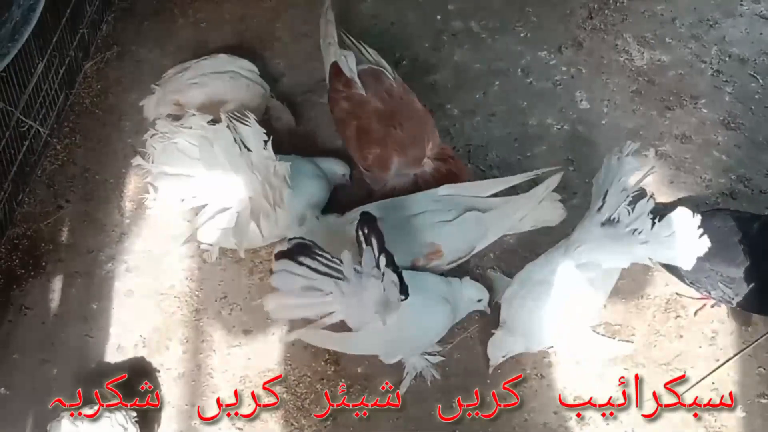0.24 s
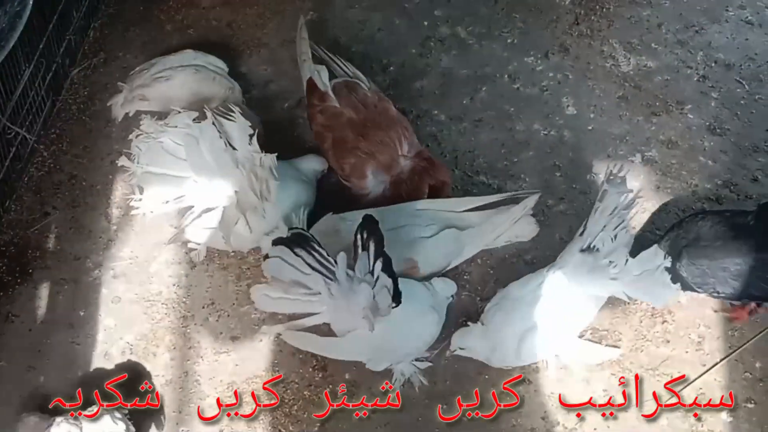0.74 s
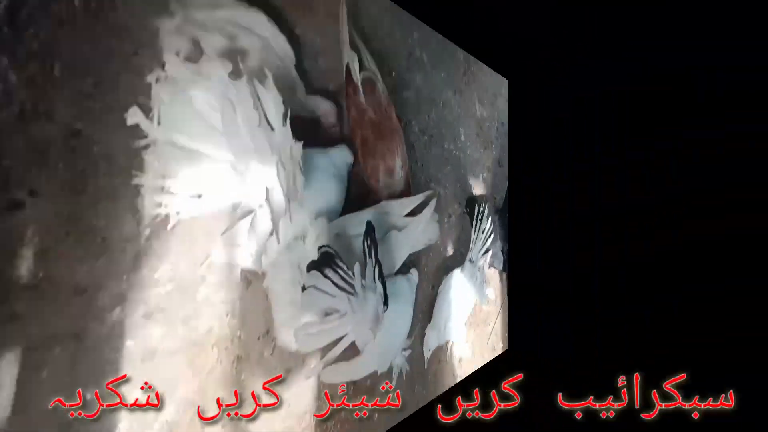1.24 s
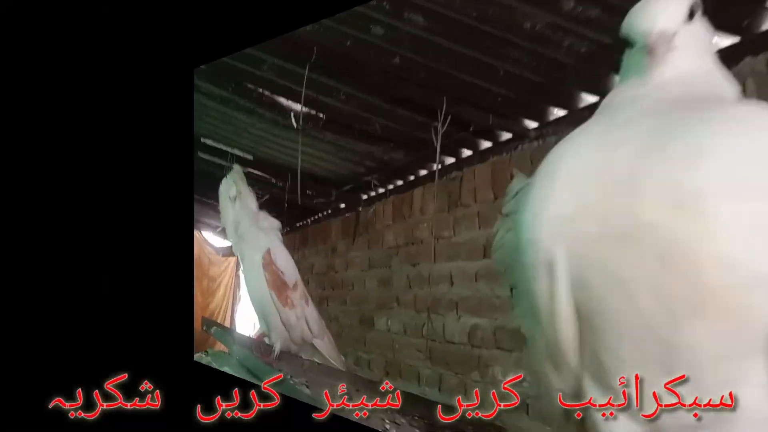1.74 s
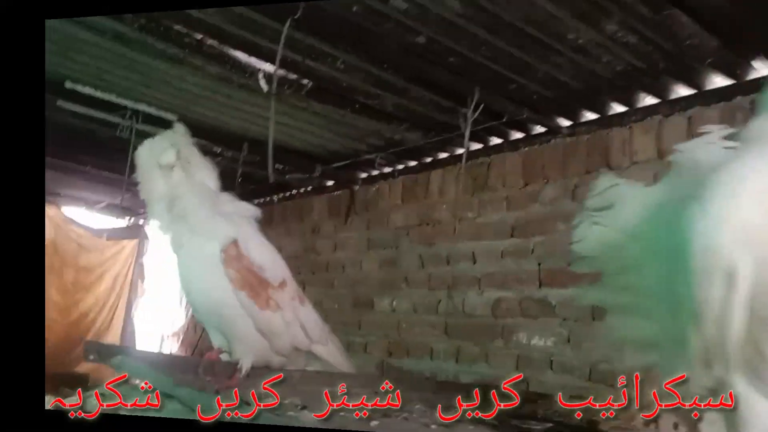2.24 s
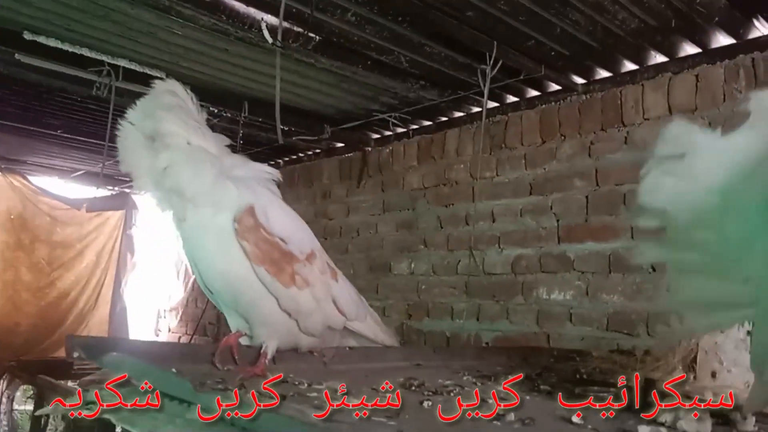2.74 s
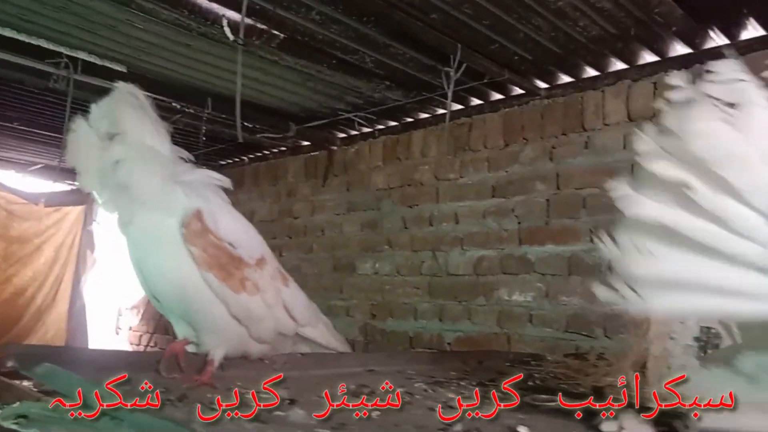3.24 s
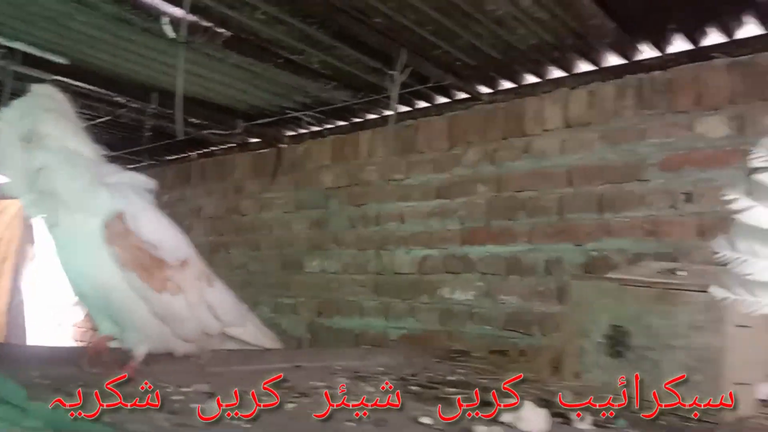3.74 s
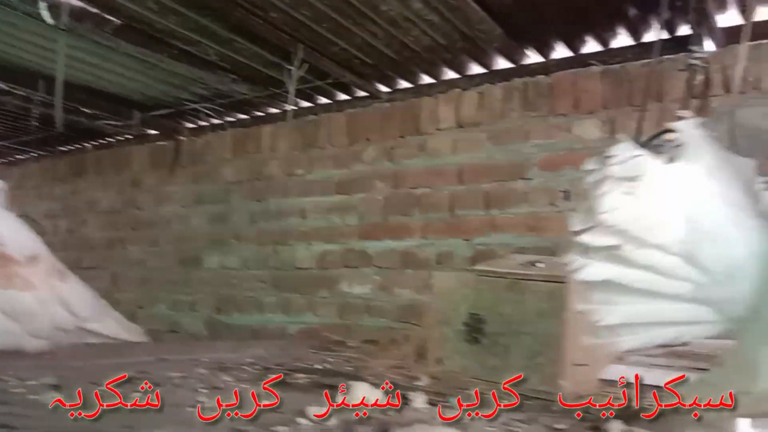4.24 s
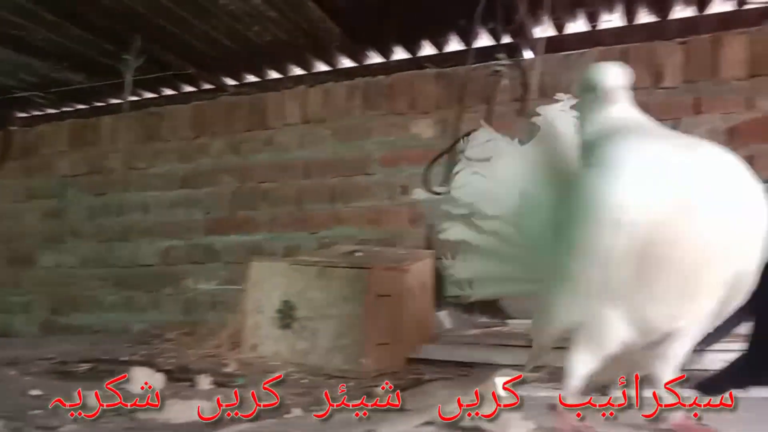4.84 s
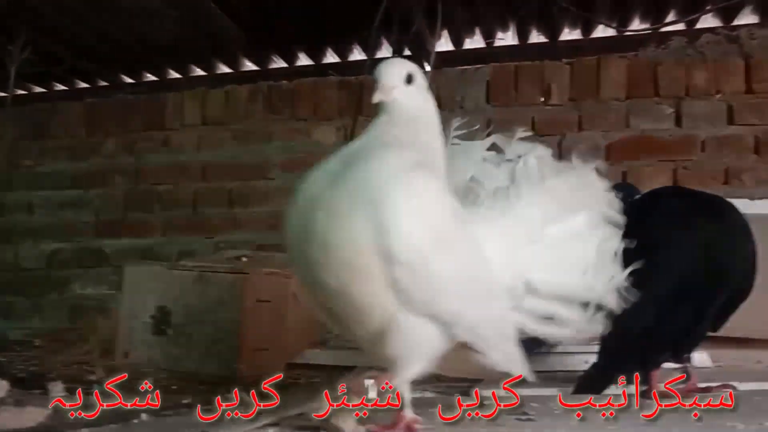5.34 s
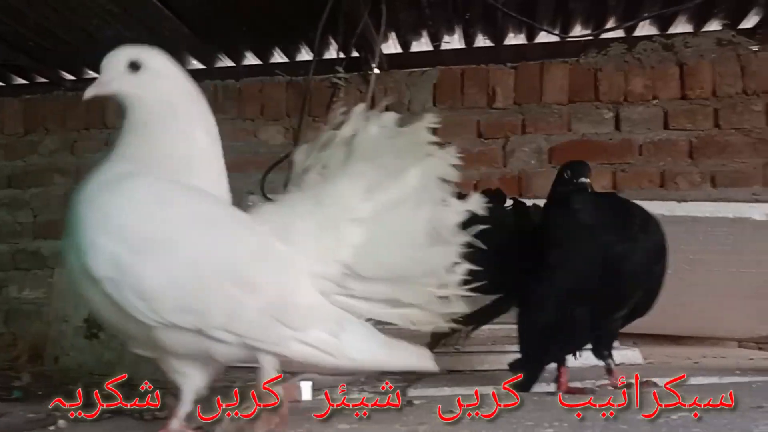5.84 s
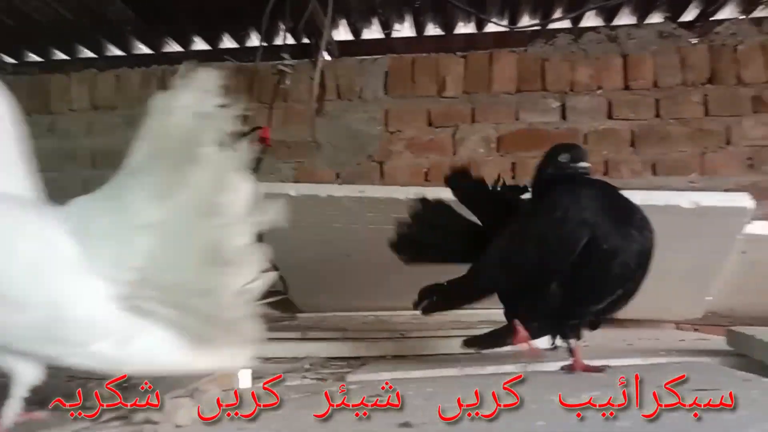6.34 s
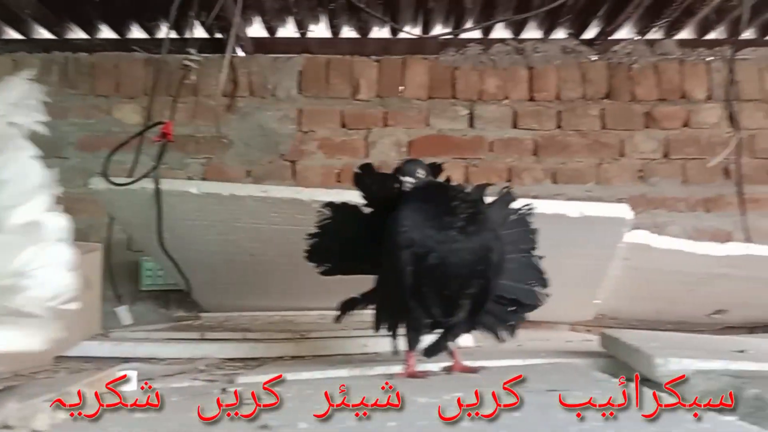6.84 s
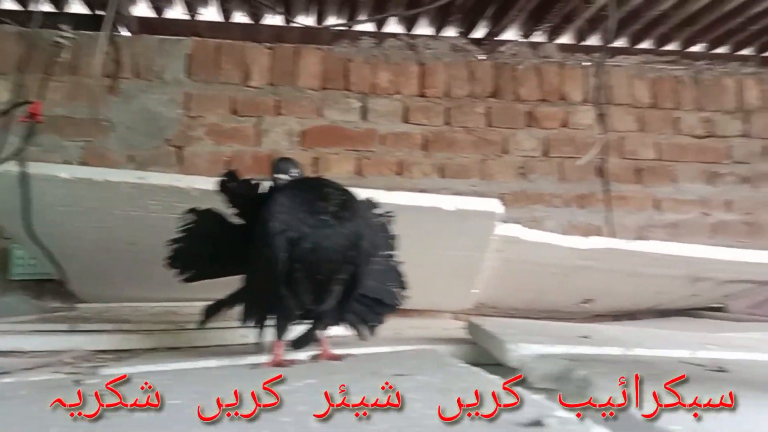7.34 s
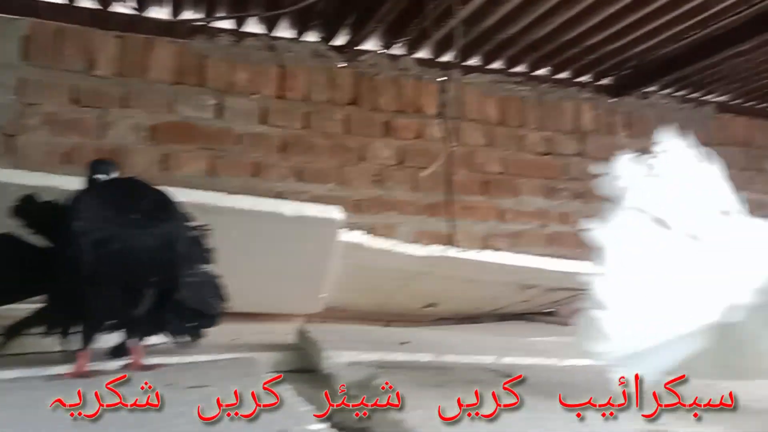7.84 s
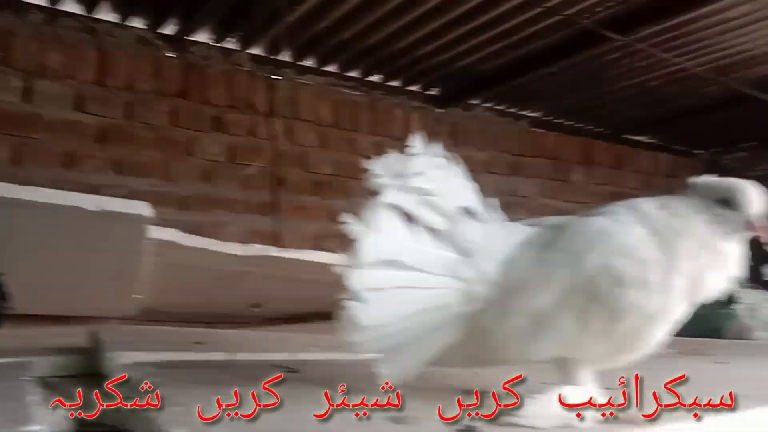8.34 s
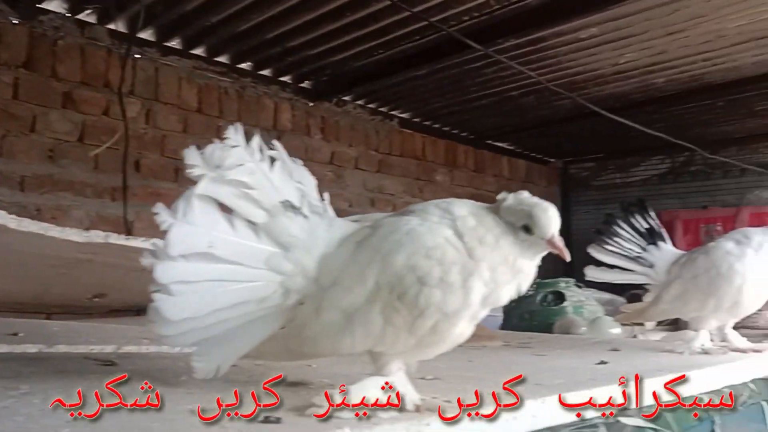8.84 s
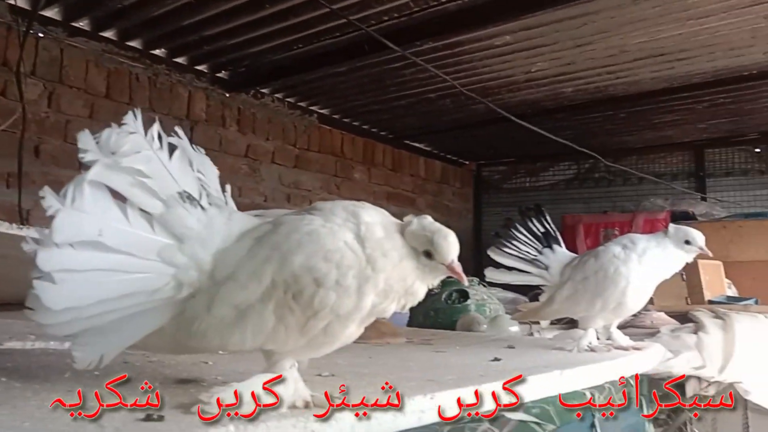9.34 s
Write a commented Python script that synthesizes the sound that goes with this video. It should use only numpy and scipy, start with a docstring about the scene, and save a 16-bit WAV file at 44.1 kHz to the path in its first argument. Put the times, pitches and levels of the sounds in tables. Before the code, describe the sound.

Caged birds beep, whistle and chirp close by over a faint twittering flock, as pigeons coo, wings flick and boards knock.

```python
"""Inside a brick bird shed with a tin roof, finches give nasal calls and small birds whistle and chirp.
The finches are pulse trains that ring a throat resonance; whistles, chirps and coos are gliding sines.
A larger bird calls twice, boards ring as sums of decaying modes, and feathers and claws are filtered noise.
The phone's noise gate lifts the far flock, the rustle and the handling rumble while near birds call.
Faint bands are suppressed and the treble dulled; the sound cuts out once for a moment and fades back.
"""
import sys
import numpy as np
from scipy import signal
from scipy.fft import rfft, irfft, next_fast_len
from scipy.io import wavfile
from scipy.ndimage import uniform_filter1d, map_coordinates

SR = 44100
rng = np.random.default_rng(int(sys.argv[2]) if len(sys.argv) > 2 else 0)


def generate_wav(signal):
    """Clip the signal to [-1, 1] and save it as 16-bit WAV at the path in sys.argv[1]."""
    frames = np.transpose(np.atleast_2d(signal))
    scaled = np.clip(frames, -1, 1) * 32767
    pcm = np.round(scaled).astype(np.int16)
    wavfile.write(sys.argv[1], SR, pcm)


N = 422478
TIME = np.arange(N) / SR

# nasal finch calls: (time [s], length [s], pitch at the top of the arch [Hz], throat resonance [Hz],
# level [dB], roughness [0-1])
NASAL_CALLS = [(-.03, 0.061, 676.3, 3604, -32.5, 0.42), (0.039, 0.071, 580, 3030, -40.5, 0.39),
               (0.139, 0.081, 514.3, 3310, -41.5, .45), (0.292, 0.068, 710, 3680, -37, 0.81),
               (0.342, 0.087, 680, 3600, -34.5, .4), (.411, 0.13, 633, 3870, -42, 0.78),
               (0.477, 0.082, 631, 3270, -38.5, 0.69), (0.565, 0.15, 597, 3000, -48.5, 0.95),
               (0.75, 0.072, 615, 3130, -57.5, 0.62), (0.814, 0.14, 646.6, 3770, -44.5, 0.72),
               (0.932, 0.092, 636, 3210, -40.5, 0.68), (1.025, 0.1, 559.3, 2744, -43, 0.51),
               (1.146, 0.099, 584, 3040, -58, 0.48), (1.74, 0.15, 677, 3500, -61, 0.89),
               (2.017, 0.1, 654, 3460, -52.5, 0.6), (2.189, 0.081, 825, 3900, -51, 0.65),
               (2.523, .16, 645.5, 3800, -39.5, 0.13), (2.844, 0.1, 662.4, 3500, -49.5, 0.69),
               (3.405, 0.062, 615, 3600, -49, 0.54), (3.566, 0.099, 646, 4170, -45.5, 0.64),
               (3.965, 0.18, 637, 3230, -53.5, 0.98), (4.193, 0.11, 731, 4160, -47, 0.6),
               (4.325, 0.17, 627.6, 3170, -45, 0.94), (4.758, 0.048, 583, 3240, -49.5, 0.74),
               (5.112, 0.11, 648, 3440, -52.5, 0.81), (5.286, 0.08, 670, 3540, -52, 0.81),
               (6.253, .27, 656, 3560, -56, 0.9), (7.025, 0.042, 612, 3400, -51.5, 0.52),
               (7.203, 0.045, 649, 3600, -65, 0.81), (7.842, .1, 544, 3450, -58.5, .54),
               (8.039, 0.084, 537, 3770, -50.5, 0.58), (8.206, 0.079, 563, 3460, -46.5, 0.66),
               (8.359, 0.086, 756, 3510, -45.5, 0.63), (8.694, 0.13, 542.5, 3550, -55.5, 0.36),
               (8.848, 0.15, 593, 3560, -54, 0.6), (8.957, .11, 575.4, 3750, -55, 0.26),
               (9.155, 0.085, 547.6, 4180, -53, 0.66), (9.37, 0.14, 544, 3540, -72.5, .4),
               (9.49, 0.097, 489.7, 3580, -57.5, 0.6)]
# spectrum of the throat resonance: (multiple of the resonance [1], level [dB])
THROAT_SPECTRUM = [(.17, -47), (.3, -30.5), (.39, -17.5), (.55, -15), (.75, -3), (1, -2), (1.25, -6.5),
                   (1.548, -16), (2.099, -24.5), (3, -41), (4, -46.5)]
# clear whistles: (time [s], length [s], start [Hz], middle [Hz], end [Hz], level [dB])
WHISTLE_NOTES = [(2.33, .19, 4660, 3858, 3760, -46), (2.648, 0.087, 4350, 4090, 3210, -40.5),
                 (2.972, .16, 3710, 3393, 3240, -56), (3.244, 0.14, 4070, 3830, 3520, -61),
                 (3.336, 0.16, 4720, 4237, 4100, -52), (3.45, 0.0498, 4090, 4000, 4060, -38.5),
                 (3.497, .05, 4080, 3950, 3640, -42), (3.685, 0.093, 4570, 3750, 3320, -41),
                 (4.024, 0.12, 2600, 2120, 2610, -50.5), (4.28, .17, 4514, 3936, 3760, -38.5),
                 (4.35, .22, 2350, 2453, 2495, -51), (5.211, 0.21, 4530, 3994, 3690, -40),
                 (5.496, .13, 4160, 4114, 3604, -39), (5.767, .115, 4390, 3990, 3650, -43.5),
                 (5.909, 0.049, 3770, 3610, 3370, -53.5), (6.1, 0.16, 2450, 2506, 2507, -48),
                 (6.25, 0.22, 2630, 2506, 2300, -71), (6.28, 0.092, 3750, 3775, 3846, -42.5),
                 (6.498, .089, 2620, 2560, 2490, -57), (6.71, 0.094, 3570, 3410, 3320, -62.5),
                 (6.931, 0.15, 2500, 2366, 2520, -62), (8.443, .14, 3290, 3445, 3455, -59.5),
                 (8.559, 0.15, 3420, 3318, 3180, -58), (8.606, 0.2, 4470, 4580, 4370, -70.5),
                 (9.157, 0.072, 6650, 6570, 6500, -57.5)]
# husky sparrow-like chirps: (time [s], length [s], start [Hz], end [Hz], level [dB])
CHIRP_NOTES = [(0.295, 0.039, 3455, 1756, -46.5), (0.825, 0.056, 5570, 2880, -43.5),
               (.952, 0.021, 2580, 3650, -49.5), (1.928, 0.071, 3380, 2327, -55),
               (2.164, 0.043, 2880, 2284, -54.5), (2.356, 0.062, 3280, 2650, -55.5),
               (2.465, 0.049, 3340, 2214, -50), (2.712, 0.03, 3860, 2490, -45.5),
               (2.791, 0.026, 3135, 1975, -51.5), (2.842, .027, 2970, 2370, -51),
               (2.858, 0.073, 1292, 1295, -66.5), (3.022, 0.045, 2380, 3320, -50.5),
               (3.116, 0.054, 3134, 2267, -48.5), (3.03, 0.052, 1447, 2130, -57.5),
               (3.118, 0.046, 1637, 1530, -52), (3.201, 0.046, 1586, 1576, -62.5),
               (3.355, 0.092, 3245, 1945, -55.5), (3.567, 0.15, 3533, 2050, -52),
               (3.953, 0.059, 6220, 4570, -42), (4.258, .098, 6580, 4190, -45.5),
               (4.445, 0.077, 3610, 2607, -44), (4.627, 0.07, 6130, 4830, -55.5),
               (5.078, 0.088, 6450, 2044, -45.5), (5.15, 0.1, 2343, 1648, -48),
               (5.304, 0.11, 2154, 1650, -48), (5.558, .049, 3290, 2430, -50),
               (5.685, 0.041, 3145, 2365, -51.5), (5.797, 0.018, 3130, 1950, -45),
               (6.071, 0.052, 4580, 3090, -48.5), (6.183, 0.066, 4880, 3100, -47),
               (6.292, 0.17, 2090, 1950, -61.5), (6.46, .066, 5707, 2880, -45.5),
               (6.834, 0.04, 5560, 4730, -66), (6.873, .034, 4660, 3300, -49),
               (7.213, .045, 2900, 3160, -68), (7.324, 0.091, 4940, 2160, -67),
               (8.37, 0.11, 1600, 1787, -56), (8.483, 0.092, 1845, 1770, -69),
               (8.674, 0.034, 1590, 1613, -62.5)]
# pigeon coo syllables, level before the crop's filter:
# (time [s], length [s], start [Hz], end [Hz], roughness [0-1], level [dB])
COO_SYLLABLES = [(1.697, .18, 867, 844, 0.14, -72.5), (1.89, 0.24, 790, 711, 0.71, -60),
                 (4.683, 0.28, 716, 734, 0.24, -72), (5.911, 0.47, 775, 742, 0.77, -46),
                 (6.217, 0.19, 739, 733, 0.3, -40), (6.378, .19, 804, 707, .7, -41),
                 (6.714, .07, 881, 890, 0.1, -52.5), (6.749, 0.082, 889, 883, 0.07, -44),
                 (6.817, 0.25, 871, 848, 0.12, -57.5), (7.073, 0.1, 835, 768, .45, -60.5),
                 (7.164, 0.061, 775, 720, 0.47, -47), (7.226, 0.073, 745, 725, 0.73, -55),
                 (7.288, 0.094, 730, 710, 0.63, -67.5)]
# two notes of a low call, each settling to a held pitch:
# (time [s], length [s], start [Hz], held [Hz], level before the throb [dB])
LOW_CALL_NOTES = [(.532, .17, 524, 412, -42), (.83, .44, 452, 445, -48)]
# harmonics of the low call: (multiple of the pitch [1], level [dB])
LOW_CALL_HARMONICS = [(1, -4.5), (2, -1.5), (3, -15), (4, -11), (5, -22)]
# feet and wings knock on the boards: (time [s], level [dB], low-pass cutoff of the blow [Hz],
# thump pitch [Hz], thump level against the blow before doubling [dB])
BOARD_KNOCKS = [(3.701, -63, 930, 732, 11), (3.978, -50.5, 3000, 600, -5), (4.656, -60, 710, 795, -2.5),
                (5.115, -60.5, 800, 550, 8), (5.51, -39.5, 900, 295, -1.5), (5.533, -46.5, 500, 244, -2),
                (5.807, -62, 2510, 1406, 14.5), (6.132, -51, 471, 462, 11.5)]
# modes of a wooden board: (frequency [Hz], level [dB], 60 dB decay time before a cap [s])
BOARD_MODES = [(295, -8.5, 0.17), (546.5, 15, 0.45), (766, 13.5, 0.097), (900, -12, 0.35),
               (990, -21.5, 0.19), (1243, 12, 0.19), (1325, 12, 0.23), (1543, 14.5, 0.31),
               (1654, -22.5, 0.27)]
# wings and tails are flicked: (time [s], length [s], level before a common trim [dB])
FEATHER_FLICKS = [(0.497, 0.057, -55), (0.614, 0.078, -55.5), (3.222, 0.043, -63.5), (3.428, .09, -60),
                  (3.553, 0.099, -66.5), (3.71, 0.08, -55), (4.013, 0.034, -65), (4.449, 0.024, -61),
                  (4.807, 0.097, -64.5), (5.129, 0.058, -52.5), (5.228, 0.19, -58.5), (5.374, 0.034, -49.5),
                  (5.616, 0.025, -49.5), (5.718, 0.022, -53.5), (5.968, 0.089, -47), (6.286, 0.045, -57),
                  (6.664, 0.037, -87), (8.023, 0.076, -72), (8.8, 0.11, -75), (9.003, 0.071, -71.5)]
# claws and seed husks tick: (time [s], peak level before a common lift [dB])
CLAW_TICKS = [(2.605, -44), (3.0624, -41), (3.1537, -42.5), (3.183, -45), (3.279, -59.5), (4.7683, -36),
              (4.793, -41), (5.4094, -68), (5.6368, -54), (5.7319, -65), (5.7927, -43), (8.1737, -50.5),
              (8.2685, -41.5), (8.437, -42), (8.7518, -51), (8.805, -47)]
# bright spectrum of the ticks and of the rustle's crackle: (frequency [Hz], level [dB])
TICK_SPECTRUM = [(500, -27.5), (1500, -12.5), (5000, 0), (8000, 1.5), (15000, -7)]
# spectrum of feather rustle: (frequency [Hz], level [dB])
RUSTLE_SPECTRUM = [(300, -7.5), (430, -11), (540, 0), (680, -6.5), (1100, -6.5), (1700, -1), (3500, 2.5),
                   (5600, -3.5), (7600, 5), (9000, -6.5), (11000, -5.5), (15500, -4.5)]
# colour of feathers close to the phone: (frequency [Hz], level [dB])
CLOSE_SPECTRUM = [(400, -3), (2000, -4), (7000, -4), (14000, 6.5)]
# bustle behind the near calls, before the noise gate: (time [s], far flock level [dB],
# feather rustle level [dB], handling rumble level before a common lift [dB])
BUSTLE_LEVELS = [(0, -49, -57, -80), (.6, -48.5, -56.5, -73), (1.1, -52, -65, -69.5),
                 (2.3, -51.5, -64, -74.5), (3.0, -52.5, -62.5, -68.5), (3.8, -50.5, -54.5, -64),
                 (4.4, -47.5, -59, -73.5), (4.9, -40, -52, -59), (5.35, -48, -54, -69),
                 (6.0, -50, -55, -68), (6.4, -47.5, -57, -67.5), (7.2, -58.5, -62, -66.5),
                 (8.1, -54, -62.5, -71), (9.58, -64.5, -62, -77)]
# the hand bumps the phone: (time [s], rumble level [dB])
HAND_BUMPS = [(.32, -62), (1.02, -54.5), (2.7, -80), (3.66, -66), (3.95, -59.5), (4.67, -56.5),
              (4.779, -64), (5.505, -59), (7.18, -65.5), (8.26, -74)]
# spectrum of the held phone's rumble: (frequency [Hz], level [dB])
RUMBLE_SPECTRUM = [(25, -33.5), (55, -6), (95, 6), (170, -10), (300, -16), (600, -8), (1200, -47.5)]
# spectrum of the still air: (frequency [Hz], level [dB])
AIR_SPECTRUM = [(30, -6), (110, -0.5), (300, -2.5), (1000, -5.5), (3000, -8), (5500, -11.5), (7500, -2.5),
                (15500, -7)]
# response of the microphone: (frequency [Hz], level [dB])
MICROPHONE_RESPONSE = [(8300, 0.5), (8900, -5.5), (9400, -11.5), (10500, -9.5), (15500, -19.5)]
# the sound cuts out once and fades back: (time [s], level [dB])
DROPOUT_LEVEL = [(1.231, 0), (1.235, -70), (1.57, -70), (1.64, 0)]

# share by which a nasal call's pitch arches: always, and extra when the voice is clear
ARCH, CLEAR_ARCH = 0.0398, .21
# whistles fainter than NEAR_DB flutter in level [dB] and quiver in pitch [share] more for each dB
NEAR_DB, FLUTTER_DB, FLUTTER_PER_DB = -38.5, 2.5, 0.16
QUIVER, QUIVER_PER_DB = .004, .0005
CHIRP_SAG = 0.97  # a chirp's middle pitch against an even slide in octaves
# pitch shake of a chirp [share of the pitch]: when level, added per octave of slide, and at most
PEEP_QUIVER, SHAKE_PER_OCTAVE, MOST_SHAKE = .012, .14, .085
OPEN_DB, SHUT_DB = -37.5, -75  # near-sound levels at which the noise gate is fully open and fully shut
BUMP_RISE_S, BUMP_T60 = 0.027, .5  # [s]
TOP_HZ = 15600


def undb(db):
    """Amplitude gain is ten to the power of a twentieth of the decibels."""
    return 10 ** (np.asarray(db) / 20)


def unit(x):
    """Normalization of power: scale to an rms of 1."""
    return x / np.sqrt(np.mean(x ** 2) + 1e-20)


def curves(rows):
    """Linear interpolation turns each column of a table into a curve over time."""
    times, *columns = np.transpose(rows)
    return [np.interp(TIME, times, column) for column in columns]


def add(track, s, x):
    """Superposition: sum x into the track at time s, cut at the track's ends."""
    start = int(s * SR)
    x = x[max(-start, 0):]
    start = max(start, 0)
    track[start:start + len(x)] += x[:N - start]


def wander(n, hz):
    """Band-limited chance: smoothly joined random points, hz of them a second, with a spread near 1."""
    place = np.arange(n) * hz / SR
    points = rng.standard_normal(int(n / 8) + 4)
    return map_coordinates(points, [place + 1], order=2, mode="wrap")


def colour(x, points, scale=1):
    """Linear filtering in the frequency domain by a spectrum of (frequency / scale, dB) points."""
    size = next_fast_len(len(x) + 256)
    hz, db = np.transpose(points)
    bins_hz = np.maximum(np.arange(size // 2 + 1) * SR / size, 1)
    gain = undb(np.interp(np.log(bins_hz), np.log(hz * scale), db))
    return irfft(rfft(x, size) * gain, size)[:len(x)]


def turn(hz):
    """Phase is the running integral of a moving pitch."""
    return 2 * np.pi * np.cumsum(hz) / SR


def swell(u, skew, sharp):
    """Amplitude envelope: a power of a sine arch as u runs from 0 to 1; a skew over 1 peaks late."""
    return unit(np.abs(np.sin(np.pi * u ** skew)) ** sharp)


def nasal(length, hz, arch, throat_hz, rough, jitter=.035, bend=.1):
    """Source and filter: syrinx pulses on an arched pitch ring the throat; rough calls waver and hiss."""
    n = int(length * SR)
    u = np.linspace(0, 1, n)
    unsteady = rough * (jitter * wander(n, 600) + bend * rough * wander(n, 70))
    # no two calls hold the pitch alike
    drift = .035 * np.sqrt(rough) * wander(n, 30)
    arched_hz = hz * (1 - arch * (2 * u - 1) ** 2)
    phase = turn(arched_hz * (1 + unsteady + drift))
    # a phase offset growing with the square of the harmonic number makes each pulse less peaky
    pulses = unit(sum(np.cos(k * phase - k ** 2 / 3) for k in range(1, 17)))
    # in rough calls the second side of the syrinx beats against the first
    pulses *= 1 + rough * np.sin(0.34 * phase + wander(n, 120))
    # the breath hisses once a cycle
    hiss = unit(rng.standard_normal(n) * (1 + np.cos(phase)) ** 2)
    voice = colour(pulses + rough * hiss, THROAT_SPECTRUM, throat_hz)
    effort = swell(u, skew=1.15, sharp=.7)
    return unit(voice * effort * undb(3.6 * rough * wander(n, 130)))


def glide(length, start_hz, middle_hz, end_hz, quiver, quiver_hz, flutter_db, octave_db, skew, sharp,
          crack=0):
    """Frequency modulation: a nearly pure note slides fastest at its ends and may crack as it stops."""
    n = int(length * SR)
    u = np.linspace(0, 1, n)
    edge = np.abs(2 * u - 1)
    outer_hz = np.where(u < .5, start_hz, end_hz)
    hz = middle_hz + (outer_hz - middle_hz) * (edge + edge ** 3) / 2
    breaking = crack * u ** 10
    phase = turn(hz * (1 - breaking + (quiver + breaking) * wander(n, quiver_hz)))
    tone = np.sin(phase) + undb(octave_db) * np.sin(2 * phase)
    return unit(tone * swell(u, skew, sharp) * undb(flutter_db * wander(n, 110)))


def perch(note, echo=.27, count=5):
    """Comb filtering: near walls give each call its own few echoes, which notch it; energy is kept."""
    out = np.pad(note, (0, SR // 50))
    for lag in rng.integers(SR // 2000, SR // 90, count):
        out[lag:lag + len(note)] += echo * note
    return out * np.linalg.norm(note) / np.linalg.norm(out)


def finches():
    """Resonant voicing: each nasal call arches in pitch, the more so the clearer the voice."""
    out = np.zeros(N)
    for s, length, hz, throat_hz, db, rough in NASAL_CALLS:
        arch = ARCH + CLEAR_ARCH * (1 - rough) ** 4
        add(out, s, undb(db) * perch(nasal(length, hz, arch, throat_hz, rough)))
    return out


def whistlers():
    """Near-sinusoidal tones with a weak octave: fainter whistles flutter and quiver more."""
    out = np.zeros(N)
    for s, length, start_hz, middle_hz, end_hz, db in WHISTLE_NOTES:
        faint_db = max(NEAR_DB - db, 0)
        note = glide(length, start_hz, middle_hz, end_hz,
                     quiver=QUIVER + QUIVER_PER_DB * faint_db, quiver_hz=591.3,
                     flutter_db=FLUTTER_DB + FLUTTER_PER_DB * faint_db,
                     octave_db=-20, skew=1.62, sharp=0.55, crack=.07)
        add(out, s, undb(db) * perch(note))
    return out


def chirpers():
    """Random frequency modulation makes a chirp husky: the further it slides, the more it shakes."""
    out = np.zeros(N)
    for s, length, start_hz, end_hz, db in CHIRP_NOTES:
        middle_hz = CHIRP_SAG * np.sqrt(start_hz * end_hz)
        octaves = abs(np.log2(start_hz / end_hz))
        shake = min(PEEP_QUIVER + SHAKE_PER_OCTAVE * octaves, MOST_SHAKE)
        note = glide(length, start_hz, middle_hz, end_hz, quiver=shake, quiver_hz=750.6,
                     flutter_db=3.0, octave_db=-29.5, skew=0.81, sharp=0.5)
        add(out, s, undb(db) * perch(note))
    return out


def pigeons(burr_hz=72, burr_swing=0.087, waver=0.079, burr_depth=1.1):
    """Joint frequency and amplitude modulation: a burr shakes near-sine coos that the crop filters."""
    out = np.zeros(N)
    for s, length, start_hz, end_hz, rough, db in COO_SYLLABLES:
        n = int(length * SR)
        u = np.linspace(0, 1, n)
        burr = np.sin(turn(burr_hz * (1 + .28 * wander(n, 60))))
        sliding_hz = start_hz + (end_hz - start_hz) * u
        hz = sliding_hz * (1 + rough * (burr_swing * burr + waver * wander(n, 167.8)))
        coo = swell(u, skew=0.93, sharp=0.86) * np.sin(turn(hz))
        add(out, s, undb(db) * coo * (1 + burr_depth * rough * burr))
    # the swollen crop rounds the tone
    return colour(out, [(350, -18), (560, 10.0), (730, 2.0), (920, -6.0), (1150, -20)])


def low_caller(throb_hz=23, throb=0.37, settle_s=.06, jitter=.026, shimmer_db=3.0):
    """Harmonic synthesis with jitter and shimmer: a larger bird's hoarse two-note call throbs."""
    out = np.zeros(N)
    for s, length, start_hz, held_hz, db in LOW_CALL_NOTES:
        n = int(length * SR)
        hz = held_hz + (start_hz - held_hz) * np.exp(-TIME[:n] / settle_s)
        phase = turn(hz * (1 + jitter * wander(n, 220)))
        voice = unit(sum(undb(part_db) * np.sin(k * phase) for k, part_db in LOW_CALL_HARMONICS))
        envelope = swell(np.linspace(0, 1, n), skew=0.62, sharp=0.99)
        add(out, s, undb(db + shimmer_db * wander(n, 130)) * voice * envelope)
    return out * (1 + throb * np.sin(turn(throb_hz * (1 + .3 * wander(N, 20)))))


def knocks(longest_s=0.19, scuff=0.99, thump_t60=0.094):
    """Modal decay: blows ring a board's modes with a short scuff, and each spot adds its own thump."""
    out, t = np.zeros(N), TIME[:SR // 4]
    ring = unit(sum(undb(db - 60 * t / min(t60, longest_s)) * np.sin(2 * np.pi * hz * t)
                    for hz, db, t60 in BOARD_MODES))
    for s, db, bright_hz, thump_hz, thump_db in BOARD_KNOCKS:
        scrape = rng.standard_normal(len(t)) * undb(-60 * t / 0.098)
        scrape = unit(colour(scrape, [(170, -32.5), (400, 8.5), (1500, 17), (6000, -36)]))
        low_pass = signal.butter(2, bright_hz, fs=SR, output="sos")
        blow = signal.sosfilt(low_pass, ring + scuff * scrape)
        onset = np.minimum(t / 0.0019, 1)
        thump = 2 * np.sin(2 * np.pi * thump_hz * t) * undb(thump_db - 60 * t / thump_t60) * onset
        # the blow's level is set by its first 20 ms
        add(out, s, undb(db) * (blow / np.std(blow[:SR // 50]) + thump))
    return out


def feathers(crackle_db=-3, crackles_per_s=45):
    """Granular noise: fluctuating, coloured noise rustles, and sparse bursts give it a fine crackle."""
    grains = rng.standard_normal(N) * undb(2.8 * wander(N, 900) + 3.7 * wander(N, 30))
    rustle = colour(grains, RUSTLE_SPECTRUM)
    # the strength is set by the part above 6.5 kHz
    treble = signal.sosfilt(signal.butter(4, 6500, "high", fs=SR, output="sos"), rustle)
    rustle /= np.std(treble)
    # sparse random bursts, each decaying quickly
    starts = (rng.random(N) < crackles_per_s / SR) * rng.exponential(size=N)
    bursts = signal.fftconvolve(starts, undb(-60 * TIME[:SR // 20] / 0.063))[:N]
    crackle = unit(colour(rng.standard_normal(N) * bursts, TICK_SPECTRUM))
    return rustle + undb(crackle_db) * crackle


def stirring(gate, flick_db=-1, tick_db=4, tick_t60=.042):
    """Envelope-shaped noise: pigeons shuffle behind the gate; near flicks and claw ticks are not gated."""
    flicks = np.zeros(N)
    for s, length, db in FEATHER_FLICKS:
        u = np.linspace(0, 1, int(length * SR))
        add(flicks, s, undb(db) * swell(u, skew=0.72, sharp=1.2))
    grain = feathers()
    shuffle = gate * undb(curves(BUSTLE_LEVELS)[1]) * grain
    out = shuffle + undb(flick_db) * flicks * colour(grain, CLOSE_SPECTRUM)
    t = TIME[:SR // 20]
    for s, db in CLAW_TICKS:
        tick = colour(rng.standard_normal(len(t)) * undb(-60 * t / tick_t60), TICK_SPECTRUM)
        add(out, s, undb(db + tick_db) * tick / np.abs(tick).max())
    return out


def far_flock(count=400, lowest_hz=1700, span_octaves=1.6):
    """Superposition of many random falling notes, clear or husky: birds in the far cages overlap."""
    out = np.zeros(N)
    for when, size, pitch, fall, shake in rng.random((count, 5)):
        hz = lowest_hz * 2 ** (span_octaves * pitch)
        slide = 1 + .2 * fall ** 2
        note = glide(.04 + .09 * size, slide * hz, hz, hz / slide,
                     quiver=.1 * np.sqrt(shake), quiver_hz=690.4,
                     flutter_db=2.0, octave_db=-12.5, skew=0.95, sharp=1.0)
        add(out, when * N / SR, note)
    return unit(out) * undb(curves(BUSTLE_LEVELS)[0])


def handling(gate, rumble_db=1, bump_depth=0.79):
    """Low-frequency contact noise: the held phone rumbles behind the gate; bumps thud lower, ungated."""
    bumps, t = np.zeros(N), TIME[:SR // 2]
    for s, db in HAND_BUMPS:
        add(bumps, s, np.minimum(t / BUMP_RISE_S, 1) * undb(db - 60 * t / BUMP_T60))
    rumble = unit(colour(rng.standard_normal(N), RUMBLE_SPECTRUM))
    grip = gate * undb(curves(BUSTLE_LEVELS)[2] + rumble_db) * rumble
    thud = unit(colour(rng.standard_normal(N), RUMBLE_SPECTRUM, bump_depth))
    return grip + bumps * thud


def still_air():
    """Stationary noise: a very faint, coloured hiss fills the shed."""
    return undb(-79) * unit(colour(rng.standard_normal(N), AIR_SPECTRUM))


def shed(x, wet_db, t60=0.24, count=14):
    """Reverberation: early echoes from brick and tin in a short diffuse tail; the response's energy is 1."""
    t = TIME[:SR // 2]
    echoes = rng.standard_normal(len(t)) * (t > .003)
    echoes[rng.integers(SR // 400, SR // 40, count)] += 9 * rng.choice([-1, 1], count)
    response = unit(echoes * undb(-60 * t / t60)) * undb(wet_db) / np.sqrt(len(t))
    response[0] += 1  # direct sound
    return signal.fftconvolve(x, response / np.linalg.norm(response))[:N]


def noise_gate(near, slope, follow_s=0.031):
    """Downward expansion: the phone's gain falls by slope dB for each dB that the near sounds fall."""
    power = np.abs(uniform_filter1d(near ** 2, size=int(follow_s * SR)))
    near_db = np.clip(10 * np.log10(power + 1e-20), SHUT_DB, OPEN_DB)
    return undb(slope * (near_db - OPEN_DB))


def scene():
    """Superposition of sources at their own depths in the shed; near sounds open the gate for the rest."""
    high = shed(finches(), wet_db=-7.0) + shed(whistlers(), wet_db=-7.5) + shed(chirpers(), wet_db=-1.5)
    low = shed(undb(1) * pigeons() + undb(-0.5) * low_caller() + knocks(), wet_db=-12.5)
    stir = shed(stirring(noise_gate(high, slope=0.46)), wet_db=-10.5)
    flock = shed(far_flock(), wet_db=2.0) * noise_gate(high, slope=0.75)
    rumble = handling(noise_gate(high + low, slope=0.75))
    return (high + low + stir + flock + rumble + still_air())[None]


def suppress(x, threshold_db=-99, depth_db=-8):
    """Spectral weighting: bands that are faint, or weaker than their neighbours, are turned down."""
    spectrum = signal.stft(x, nperseg=512)[2]
    power = uniform_filter1d(np.abs(spectrum) ** 2, size=3, axis=-2)  # over frequency
    power = uniform_filter1d(power, size=5, axis=-1) + 1e-20  # over time
    neighbours = np.abs(uniform_filter1d(power, size=21, axis=-2)) + 1e-20
    gain = np.maximum(power / (power + undb(threshold_db) ** 2), undb(depth_db))
    # bands that stand out are raised a little
    gain *= np.clip(power / neighbours, .25, 1.2) ** .35
    return signal.istft(spectrum * gain)[1][:, :N]


def record(dry):
    """Filters in series: bands are suppressed, treble dulled, top cut; the sound cuts out and fades back."""
    heard = colour(suppress(dry)[0], MICROPHONE_RESPONSE)
    heard = heard * undb(curves(DROPOUT_LEVEL)[0])
    top_cut = signal.ellip(10, .2, 70, TOP_HZ, fs=SR, output="sos")
    return signal.sosfilt(top_cut, heard)[None]


dry = scene()
out = record(dry)
generate_wav(out)
```